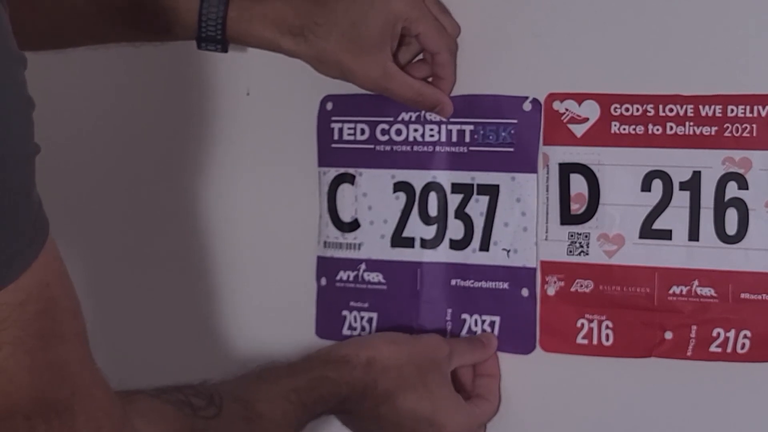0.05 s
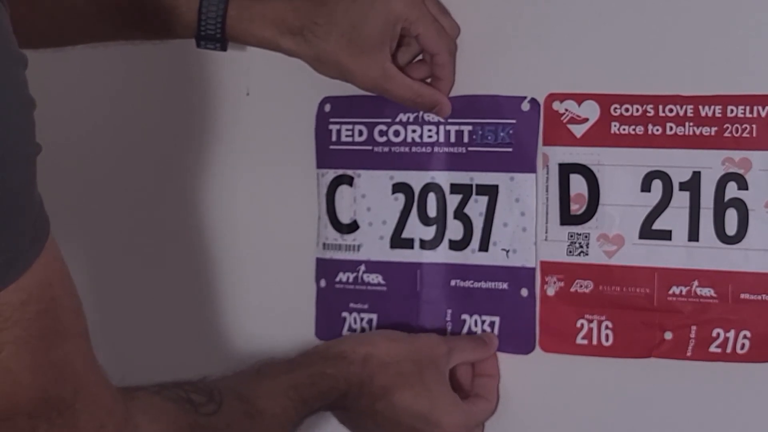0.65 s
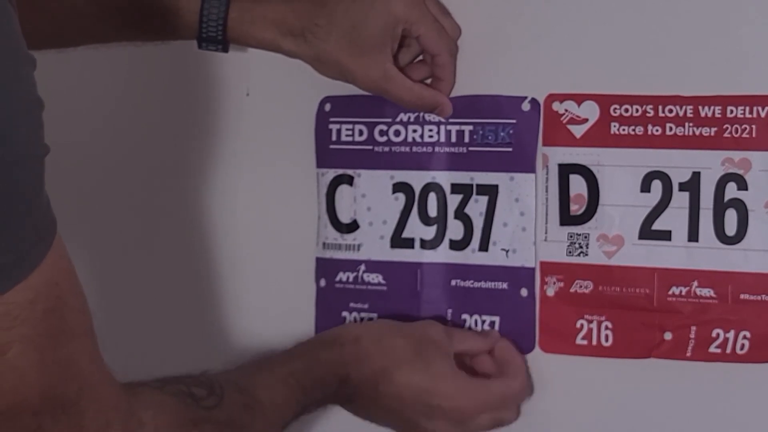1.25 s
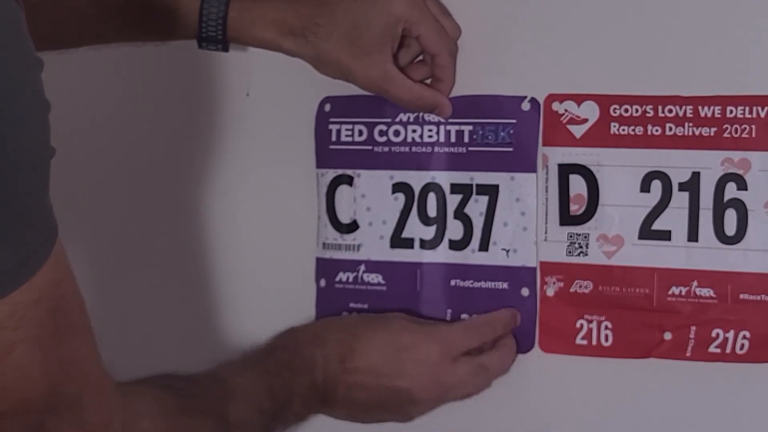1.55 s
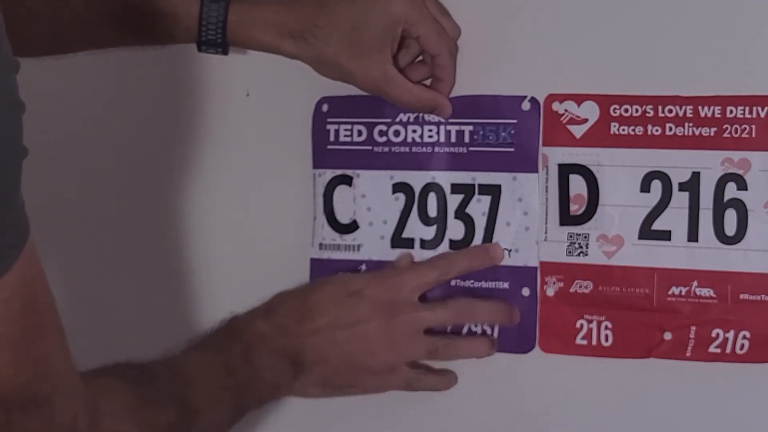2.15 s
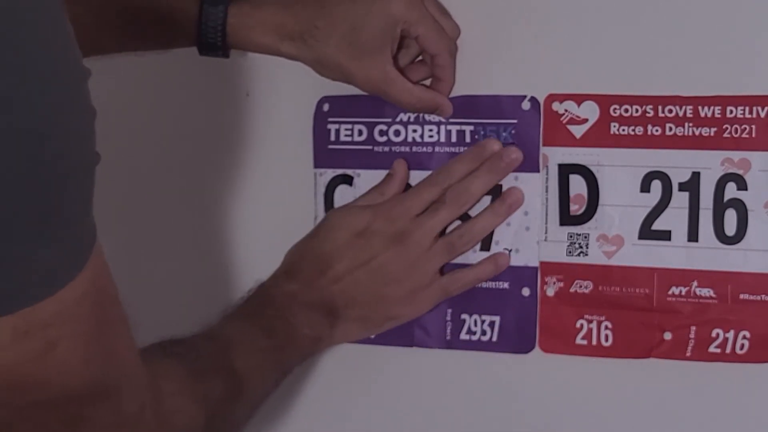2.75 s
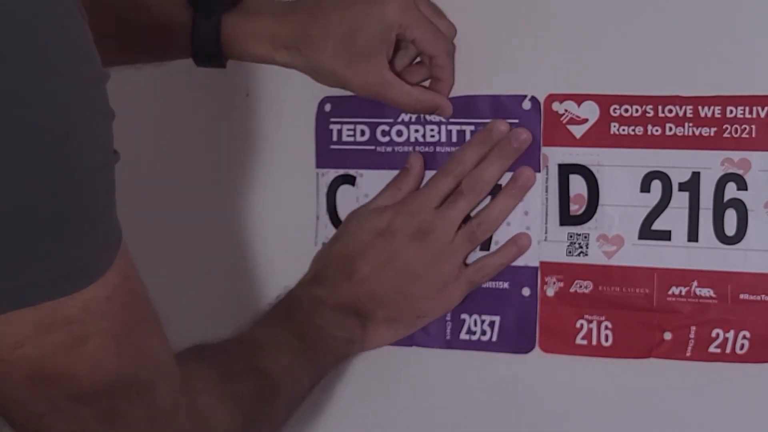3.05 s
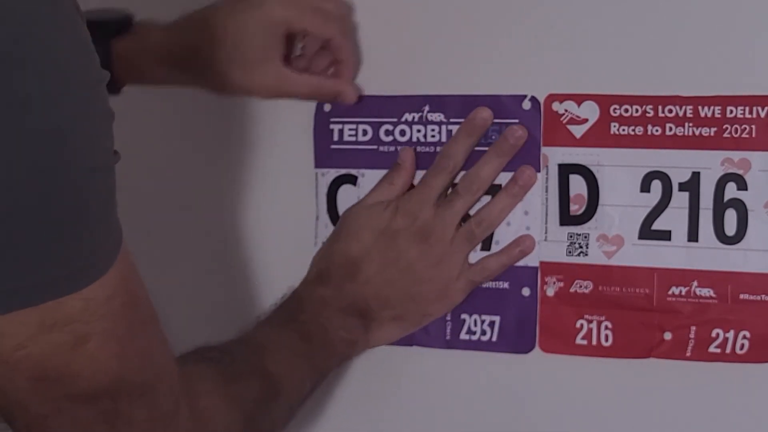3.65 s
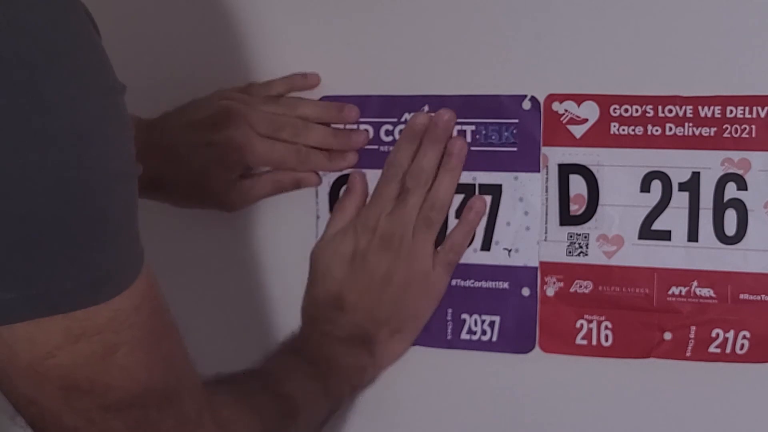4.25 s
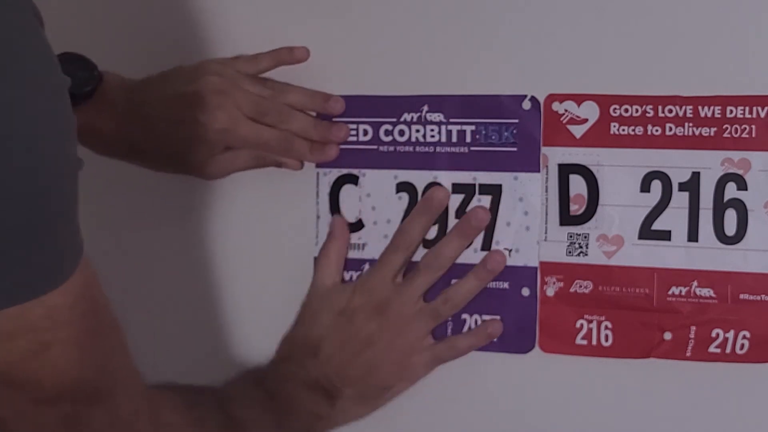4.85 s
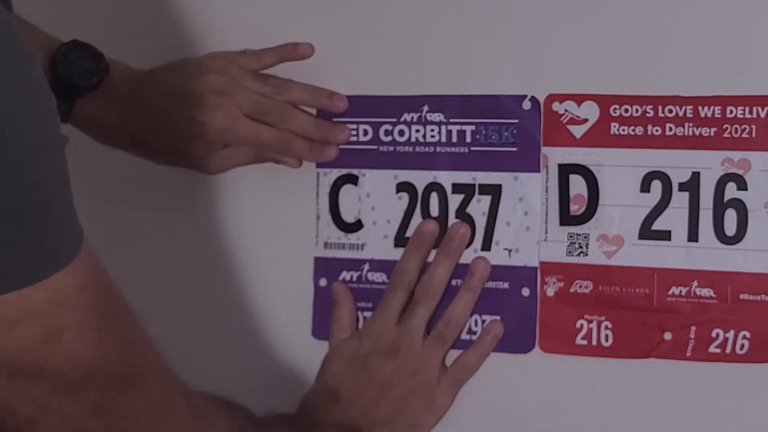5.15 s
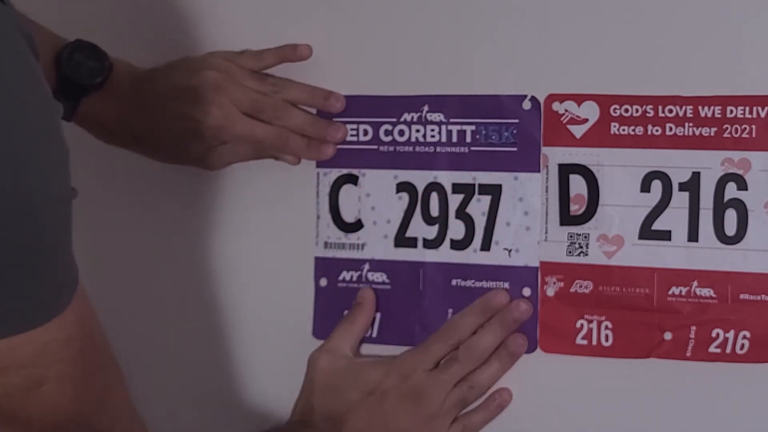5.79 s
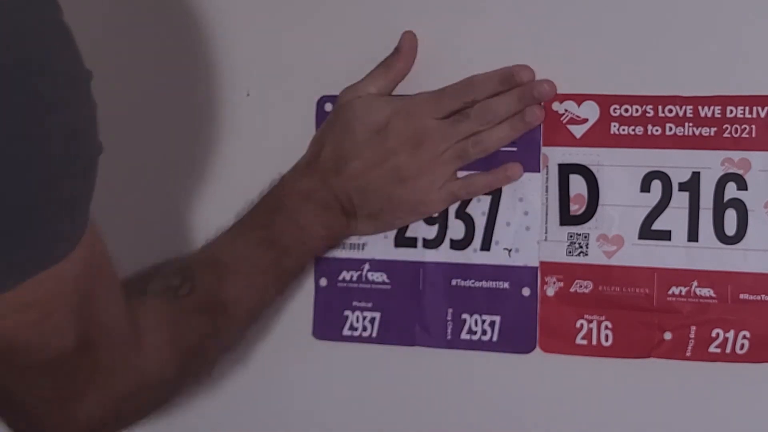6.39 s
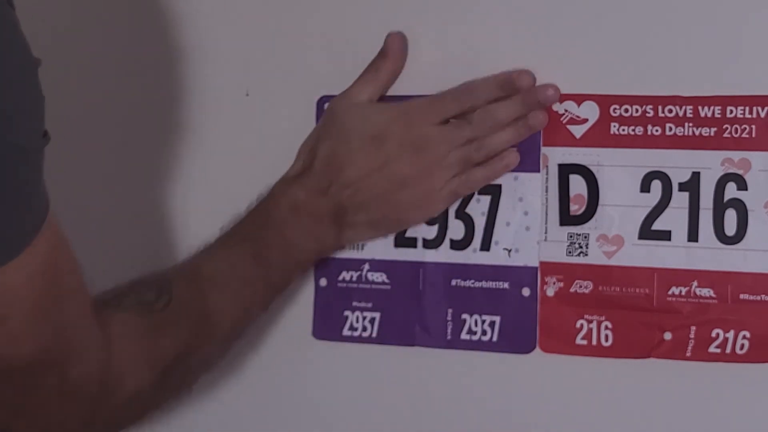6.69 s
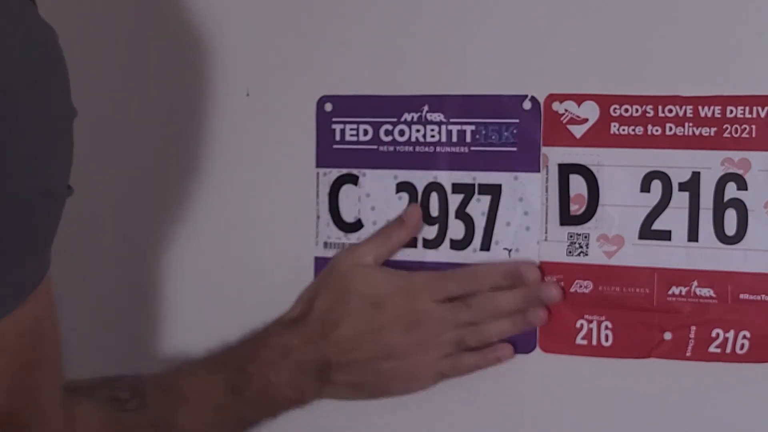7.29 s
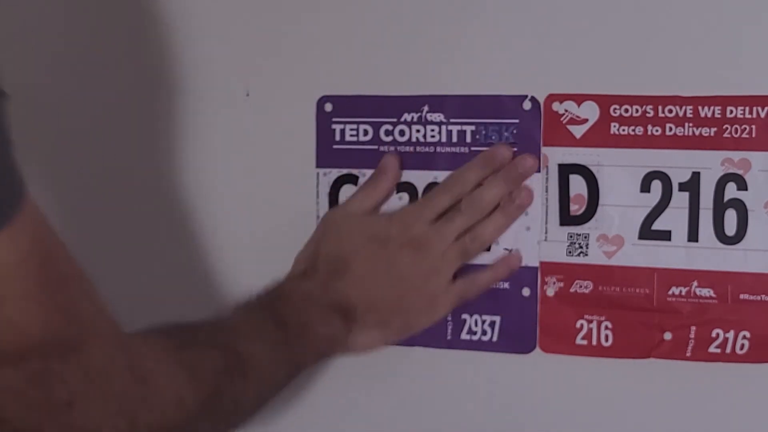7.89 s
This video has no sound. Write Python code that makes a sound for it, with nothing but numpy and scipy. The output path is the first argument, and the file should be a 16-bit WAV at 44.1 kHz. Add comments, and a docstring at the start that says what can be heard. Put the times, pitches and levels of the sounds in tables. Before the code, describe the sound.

Skin brushes over stiff paper in a run of soft, close swishes, mixed with light crackles and a faint knock as the sheet is pressed onto a hollow wall. Then come three much louder palm pats, about half a second apart, each a slap with a low boom. One last soft rub follows, over faint room noise and hum.

```python
"""Paper smoothed and patted onto a wall

A stiff sheet is smoothed onto a hollow wall in a small room, then patted three times with a flat palm. Skin
hisses over the fibres; the paper snaps as it is pressed down and fingertips knock, once with a tiny clink. Each
pat is a slap of trapped air and a boom of the wall panel; the room rings briefly. Underneath: moving arms, a
faint high hiss, quiet room noise and hum."""
import sys
import numpy as np
from scipy import signal
from scipy.fft import rfft, irfft
from scipy.io import wavfile
from scipy.ndimage import uniform_filter1d

SR = 44100
rng = np.random.default_rng(int(sys.argv[2]) if len(sys.argv) > 2 else 0)


def put_to_file(sound):
    """Save the sound as 16-bit audio at rate SR, in the file named by the first command-line argument."""
    columns = np.atleast_2d(sound).T  # one column per channel
    safe = np.clip(columns, -1, 1)
    whole_steps = np.round(safe * 32767)
    wavfile.write(sys.argv[1], SR, whole_steps.astype(np.int16))


N = 349713

# Each row: start in seconds, slap level in dB, hand landing time in seconds, tilt in dB per octave,
# air pocket resonance in Hz, its gain in dB, boom gain in dB.
PALM_PATS = [(6.381, -24.5, 0.0075, -1.2, 1670, 9, 0), (6.938, -13, 0.00853, -1.6, 1410, 7.5, 0),
             (7.472, -14.5, 0.0058, -1.43, 3465, -0.5, 1)]


def slaps(settle_s=0.001, flap_db=-21, flap_s=0.046, lead_in_db=-26, lead_in_s=0.006, margin_s=0.02):
    """A faint swell leads into each slap, the palm squeezes the air out with a crack, and the sheet flaps
    briefly."""
    # Each row: frequency in Hz, gain in dB.
    spectrum = [(100, -15), (250, 4.5), (700, 4), (920, -6), (1150, -6), (1600, -5.3), (2400, -5),
                (3500, -0.5), (5000, -4.5), (7500, -5.5), (9500, -12.5), (13000, -9), (15500, -10.5)]
    out, t = np.zeros(N), np.arange(SR // 7) / SR - margin_s
    for start_s, db, landing_s, tilt_db_per_oct, pocket_hz, pocket_db, _ in PALM_PATS:
        squeeze = np.clip(t / landing_s, 0, 1) ** 0.92
        contact = squeeze * np.exp(-np.maximum(t - landing_s, 0) / settle_s)
        lead_in = amp(lead_in_db) * np.exp(-abs(t) / lead_in_s)
        flap = amp(flap_db) * np.exp(-abs(t) / flap_s)
        envelope = contact + np.where(t < 0, lead_in, flap)

        def colour(hz):
            tilt_db = tilt_db_per_oct * np.log2(np.maximum(hz, 300) / 2000)
            return amp(curve_at(spectrum, hz) + tilt_db) * resonance(hz, pocket_hz, pocket_db, q=3)
        add(out, start_s - margin_s, burst(envelope, minimum_phase(colour), db))
    return out


def wall_ring(t, spot, tilt_db_per_oct=0):
    """Panel modes after a push at one spot; each swings up over about one cycle."""
    # Each row: frequency in Hz, T60 in seconds, level in dB for a push at the sheet's top (spot 0),
    # bottom (1) and middle (2).
    modes = [(36.74, 0.63, -8.5, -4.5, -8.5), (52.1, 0.14, -28, -11, -24.5), (57.5, .16, 0, 2.5, -6.5),
             (87.9, 0.23, -11, -14, -2), (99.2, 0.22, -29, -16, -15), (114.1, 0.33, -23, -13, -19.5),
             (149.5, 0.292, -27, -17.5, -13), (174, .12, -19, -4.5, -20), (194.7, 0.25, -25.5, -13, -35),
             (222.8, 0.26, -25.5, -31, -30.5), (269.3, .26, -24.5, -20.5, -19.5),
             (302, 0.24, -25, -26, -17.5), (366, 0.33, -38.5, -31.5, -22.5),
             (395.4, 0.4, -35, -30.5, -25.5), (428.4, 0.16, -32.5, -20, -28), (492, 0.15, -37, -20, -30.5),
             (565.5, 0.32, -39.5, -27, -27.5), (683, 0.4, -48, -28.5, -30), (734.5, 0.16, -37, -20, -20.5)]
    out = 0
    for k, (hz, t60_s, *spot_db) in enumerate(modes):
        db = spot_db[spot] + tilt_db_per_oct * np.log2(hz / 100) - 60 * t / t60_s
        swing = (1 - np.exp(-(t * hz) ** 2)) * amp(db)
        # shorter waves reach the two microphones less alike
        skew_rad = 0.19 * (hz / 500) ** 0.77 * (-1) ** k * np.array([[1], [-1]])
        out = out - swing * np.sin(2 * np.pi * hz * t + skew_rad)
    return out


def booms(puff_db=-33, puff_s=0.005, hold_s=0.385, stop_db_per_s=147, waver_hz=5.8, depth_db=5):
    """Each pat pushes a puff of air and booms the hollow wall; presses ring it faintly."""
    # Each row: start in seconds, level in dB, T60 under the resting hand in seconds.
    presses = [(3.06, -35.5, 0.96), (3.424, -49.5, .3), (3.617, -49, 0.34)]
    out, t = np.zeros((2, N)), np.arange(SR * 2 // 3) / SR
    # the boom wavers ever deeper, then stops short
    waver_db = depth_db * np.minimum(t / hold_s, 1) ** 2 * np.cos(2 * np.pi * waver_hz * t)
    fade = amp(waver_db - stop_db_per_s * np.maximum(t - hold_s, 0))
    for spot, (start_s, *_, boom_db) in enumerate(PALM_PATS):
        puff_time = (np.arange(N) / SR - start_s) / puff_s
        out -= 2 * amp(puff_db) * puff_time * np.exp(-puff_time ** 2)
        add(out, start_s, amp(boom_db) * fade * wall_ring(t, spot))
    for start_s, db, t60_s in presses:  # fingers move less of the panel than a palm: less bass
        add(out, start_s, amp(db - 60 * t / t60_s) * wall_ring(t, spot=1, tilt_db_per_oct=3))
    return out


def rubbing(hiss_db=1, scrape_db=-0.5, grain_db=2, clump_db=0.6, clump_hz=70):
    """Skin catches on paper fibres in clumps: fine hiss and coarser scrape follow each swish."""
    # Each row: peak time in seconds, level in dB, rise and fall in seconds, scrape offset in dB.
    swishes = [(1.365, -78, 0.023, 0.084, 11), (1.675, -68.5, 0.042, 0.056, 6),
               (1.89, -65, 0.019, 0.093, 6.5), (2.065, -51, 0.037, 0.084, -9.5),
               (2.24, -53, 0.037, 0.05, -17), (2.36, -54, 0.09, 0.086, -7), (2.465, -52.5, 0.11, 0.12, -11),
               (2.6, -70, 0.12, 0.11, 8.5), (2.81, -61, 0.098, 0.24, 0.5), (3.35, -62, 0.14, 0.18, 3.5),
               (3.86, -50, 0.065, 0.072, -2.5), (4.02, -53.5, 0.11, .12, 0.5),
               (4.31, -52.5, .11, 0.072, -0.5), (4.555, -47, 0.12, 0.14, -4.5),
               (4.78, -54.5, 0.065, 0.081, -8), (4.954, -48, 0.073, .1, -6),
               (5.321, -56.5, 0.034, 0.05, -5), (5.51, -49, 0.067, 0.058, -11),
               (5.735, -69, 0.11, 0.1, 4.5), (5.97, -73.5, 0.042, 0.078, 7), (7.87, -58, 0.054, 0.2, -5.5)]
    # Each row, in both: frequency in Hz, relative spectral density in dB.
    hiss_spectrum = [(1000, -28), (2500, -41), (4500, -8), (7500, -0.5), (9500, -6), (13000, -1),
                     (16000, -6.5)]
    scrape_spectrum = [(400, -21), (1500, -12), (2300, -12.5), (3100, -2), (4500, -2), (6500, -4),
                       (10000, -16)]
    hiss_gain, scrape_gain = np.zeros(N), np.zeros(N)
    for peak_s, db, rise_s, fall_s, offset_db in swishes:
        motion = amp(db) * swell(peak_s, rise_s, fall_s)
        hiss_gain = np.hypot(hiss_gain, amp(hiss_db) * motion)
        scrape_gain = np.hypot(scrape_gain, amp(scrape_db + offset_db) * motion)
    clumps = unit_rms(signal.lfilter(*signal.butter(2, clump_hz, fs=SR), rng.standard_normal(N)))
    catches = amp(grain_db * rng.exponential(1, N) + clump_db * clumps)
    fine, coarse = catches * rng.standard_normal((2, 2, N))
    hiss = hiss_gain * coloured(diffuse(fine), hiss_spectrum)
    scrape = scrape_gain * coloured(diffuse(coarse), scrape_spectrum)
    return hiss + scrape


def snaps(ring_db=6, knock_db=-24, knock_hz=500):
    """The sheet buckles in short cracks and fingertips knock, each with its own band and a slight knock of the
    wall."""
    # Each row: start in seconds, level in dB, pitch in Hz, bandwidth in octaves, decay in seconds.
    cracks = [(0.046, -65.5, 844, 2.4, 0.0036), (1.070, -50.5, 6050, 2.5, 0.0018),
              (1.354, -66, 3500, 1.2, .009), (1.97, -56, 2780, 1.34, 0.0045),
              (2.103, -46.5, 2330, 2.06, .0039), (2.831, -56.5, 1050, 1.8, 0.011),
              (2.857, -34, 3300, 2.25, .0008), (2.946, -44, 1240, 0.37, 0.0019),
              (2.9476, -33.5, 3400, 2.06, .0019), (3.046, -46, 2640, 1.9, 0.004),
              (3.416, -53, 2070, 2.9, 0.0062), (3.534, -44.5, 3160, 2.12, 0.0017),
              (3.612, -48.5, 2960, 2.46, .0027), (4.250, -45, 1540, 0.65, 0.0019),
              (4.938, -60.5, 1490, 1.3, 0.0037), (5.141, -55.5, 2050, 2.1, .003),
              (6.663, -62.5, 2400, 2.9, .0059), (7.288, -53, 3780, 1.9, 0.0025)]
    out, t = np.zeros(N), np.arange(SR // 16) / SR
    for start_s, db, pitch_hz, octaves, decay_s in cracks:
        centre_hz = 0.89 * pitch_hz
        low_hz, high_hz = centre_hz * 2 ** (np.array([-0.5, 0.5]) * octaves)

        def band(hz):  # narrower band, steeper edges
            crack = 1 / np.hypot(1, (low_hz / (hz + 1)) ** (6 / octaves))
            crack /= np.hypot(1, (hz / high_hz) ** (7.8 / octaves))
            knock = amp(knock_db) * np.exp(-np.log2((hz + 1) / knock_hz) ** 2)
            return crack * resonance(hz, pitch_hz, ring_db) + knock
        add(out, start_s, burst(np.exp(-t / decay_s), minimum_phase(band), db))
    return out


def clink(start_s=1.069, rise_s=0.0014):
    """One tiny clink: high partials swell for an instant and die."""
    # Each row: frequency in Hz, level in dB, T60 in seconds.
    partials = [(1920, -56, 0.045), (2850, -51, 0.033), (3740, -39, 0.027), (4030, -41, 0.024),
                (5700, -58, 0.04), (7530, -53, 0.05), (10280, -49, .04), (11430, -46, 0.04)]
    out, t = np.zeros(N), np.arange(SR // 4) / SR
    attack = 1 - np.exp(-t / rise_s)
    for hz, db, t60_s in partials:
        add(out, start_s, attack * amp(db - 60 * t / t60_s) * np.sin(2 * np.pi * hz * t))
    return out


def rumble_and_hiss(high_hiss_db=-90, full_s=2.3, growth_db_per_s=2):
    """Moving arms stir a faint rumble of air. A faint high hiss grows, then holds."""
    # Each row: peak time in seconds, rumble level in dB, half length in seconds.
    arm_moves = [(2.3, -70, 0.34), (4.907, -67, .55), (6.197, -70, 0.98), (7.7, -59.5, 1)]
    # Each row, in both: frequency in Hz, relative spectral density in dB.
    rumble_spectrum = [(15, -10), (35, 0), (60, -8.5), (82, 7), (110, -11.5), (300, -40.5)]
    high_hiss_spectrum = [(2000, -17.5), (7000, 8), (9000, -9), (13000, -1), (15500, -9.5)]
    rumble = sum(amp(db) * swell(peak_s, half_s, half_s) for peak_s, db, half_s in arm_moves)
    high_hiss = amp(high_hiss_db - growth_db_per_s * np.maximum(full_s - np.arange(N) / SR, 0))
    noise = diffuse(rng.standard_normal((2, N)))
    return rumble * coloured(noise, rumble_spectrum) + high_hiss * coloured(noise, high_hiss_spectrum)


def room(x, direct_db=-1.5, early_db=-5, tail_db=-1, build_s=0.00095, peak_width_hz=35, gain_db=-0.5):
    """Direct sound, near reflections and a tail decaying per band, all coloured by narrow resonances."""
    # Each row: frequency in Hz, T60 in seconds.
    decay_times = [(150, 0.44), (400, 0.36), (1000, 0.38), (2800, 0.35), (7300, .35), (14000, 0.17)]
    # Each row: centre in Hz, gain in dB.
    peaks = [(1066, 1), (1150, 1.5), (1281, -3.5), (1476, 0.5), (1637, -2.5), (1972, 5), (2986, -5),
             (3438, 3.5)]
    noise = diffuse(rng.standard_normal((2, SR * 2 // 3)))
    hz, t, bands = signal.stft(noise, SR, nperseg=256)
    decay = amp(-60 * t / curve_at(decay_times, hz)[:, None])
    tail = signal.istft(bands * decay, SR, nperseg=256)[1]
    tail *= 1 - np.exp(-np.arange(tail.shape[1]) / SR / build_s)
    response = amp(tail_db) * tail / np.linalg.norm(tail[0])
    for channel in response:
        delays_s = rng.uniform(0.0018, 0.016, size=12)
        signs = rng.choice([-1, 1], len(delays_s))
        channel[(delays_s * SR).astype(int)] += amp(early_db) * signs / np.sqrt(len(delays_s))
    response[0, 0] += amp(direct_db)
    response[1, 1] += amp(direct_db)  # right microphone slightly farther away

    def colour(hz):
        gains = [resonance(hz, peak_hz, db, q=peak_hz / peak_width_hz) for peak_hz, db in peaks]
        return np.prod(gains, axis=0)
    x = amp(gain_db) * signal.oaconvolve(x, minimum_phase(colour, size=8192))
    return np.array([signal.oaconvolve(x, whiten(channel, bins=501))[:N] for channel in response])


def room_tone(noise_db=-66):
    """Quiet room noise with a faint steady hum and whine."""
    # Each row: frequency in Hz, RMS level in dB.
    tones = [(80.7, -78.5), (151, -76), (619, -86), (11703, -95.5)]
    # Each row: frequency in Hz, relative spectral density in dB.
    spectrum = [(12, -37), (20, -8.5), (158, -9.5), (182, -13.5), (293, -10), (399, -21), (624, -20.5),
                (678, -24), (1440, -23.5), (1900, -22), (2350, -31.5), (3500, -23), (4600, -31),
                (6910, -31.5), (7520, -26.5), (8410, -53), (16000, -51.5)]
    t = np.arange(N) / SR
    hum = sum(amp(db) * np.sqrt(2) * np.sin(2 * np.pi * (hz * t + rng.random())) for hz, db in tones)
    return amp(noise_db) * coloured(diffuse(rng.standard_normal((2, N))), spectrum) + hum


def swell(peak_s, rise_s, fall_s, drop_db=9.5):
    """Gain of a movement that speeds up and slows: drop_db down at one rise or fall time from the peak."""
    t = np.arange(N) / SR - peak_s
    away = np.minimum(np.maximum(-t / rise_s, t / fall_s), 10)
    return amp(-drop_db * away ** 1.45)


def burst(envelope, response, db):
    """A filtered cluster of tiny impacts; db is its level spread over 10 ms."""
    impacts = whiten(envelope * rng.standard_normal(len(envelope)), bins=201)
    sound = signal.fftconvolve(impacts, response)
    return amp(db) * sound / np.linalg.norm(sound) * np.sqrt(SR / 100)


def diffuse(pair):
    """Makes two unrelated channels alike in the bass, as at two nearby microphones."""
    # Each row: frequency in Hz, left-right correlation.
    correlation = [(50, 0.74), (250, 0.83), (640, 0.35), (1400, -0.18), (3000, 0.037), (15000, 0.052)]
    left, right = rfft(pair)
    shared = np.clip(curve_at(correlation, np.fft.rfftfreq(pair.shape[1], 1 / SR)), -1, 1)
    right = shared * left + np.sqrt(1 - shared ** 2) * right
    return irfft(np.array([left, right]), pair.shape[1])


def whiten(x, bins, size=1 << 15):
    """Flattens the spectrum of x, smoothed over bins."""
    power = uniform_filter1d(abs(rfft(x, size)) ** 2, bins)
    gain = np.sqrt(power.mean() / (abs(power) + 1e-12))
    inverse = minimum_phase(lambda hz: np.interp(hz, np.fft.rfftfreq(size, 1 / SR), gain))
    return signal.fftconvolve(x, inverse)[:len(x)]


def minimum_phase(gain_at, size=4096):
    """Causal impulse response with magnitude gain_at(hz)."""
    log_gain = np.log(np.maximum(gain_at(abs(np.fft.fftfreq(size, 1 / SR))), 1e-5))
    return np.fft.ifft(np.exp(np.conj(signal.hilbert(log_gain)))).real[:size // 2]


def resonance(hz, centre_hz, db, q=7):
    """Gain of a peak or dip of height db."""
    return 1 + (amp(db) - 1) / (1 + (2 * q * (hz / centre_hz - 1)) ** 2)


def equalise(x, spectrum):
    return irfft(rfft(x) * amp(curve_at(spectrum, np.fft.rfftfreq(N, 1 / SR))), N)


def coloured(x, spectrum):
    return unit_rms(equalise(x, spectrum))


def curve_at(points, hz):
    point_hz, values = np.transpose(points)
    return np.interp(np.log(hz + 1), np.log(point_hz + 1), values)


def unit_rms(x):
    return x / np.sqrt(np.mean(x ** 2) + 1e-20)


def amp(db):
    return 10 ** (np.asarray(db) / 20)


def add(mix, start_s, sound):
    part = mix[..., round(start_s * SR):][..., :sound.shape[-1]]
    part += sound[..., :part.shape[-1]]


def scene():
    """Hand, paper and wall; only the sharp sounds ring the room."""
    return room(slaps() + snaps() + clink()) + booms() + rubbing() + rumble_and_hiss() + room_tone()


def record(dry, cutoff_hz=15800):
    """Two slightly unlike microphones, then a low-pass."""
    # Each row: frequency in Hz, left gain relative to right in dB.
    left_response = [(35, 1.6), (80, -1), (160, -2), (500, -1.8), (1400, 2.17), (5000, 0), (9000, 1.6),
                     (14000, -4)]
    pair = np.array([equalise(dry[0], left_response), dry[1]])
    lowpass = signal.firwin(511, cutoff_hz, window=("kaiser", 9), fs=SR)
    return signal.oaconvolve(pair, lowpass[None], "same")


dry = scene()
out = record(dry)
put_to_file(out)
```